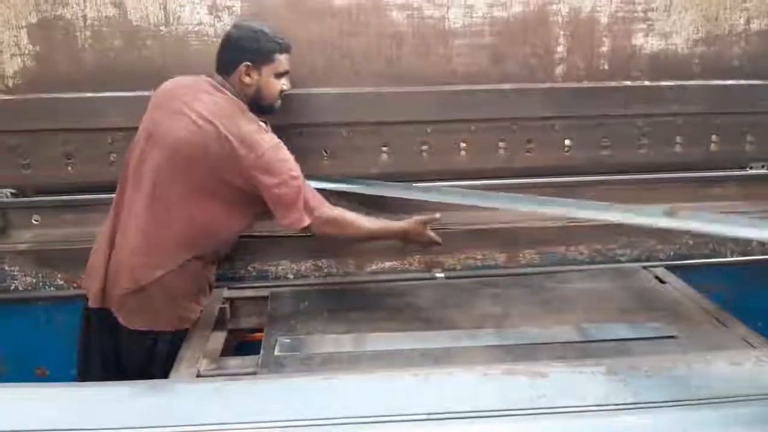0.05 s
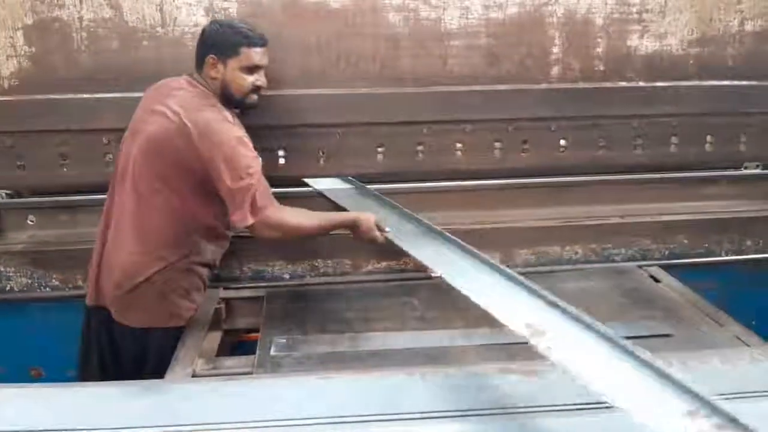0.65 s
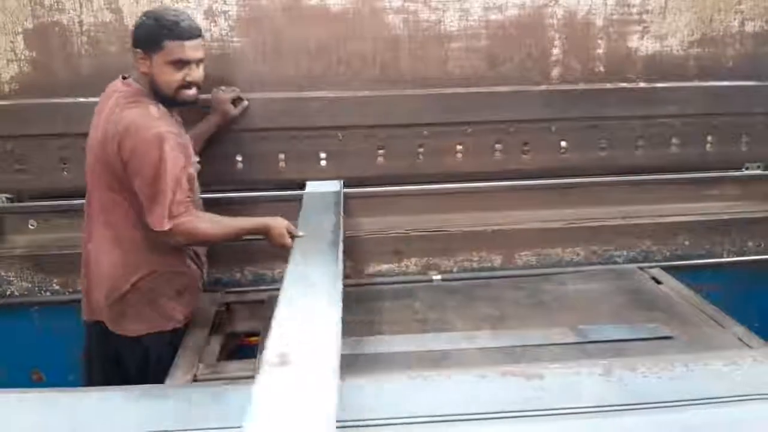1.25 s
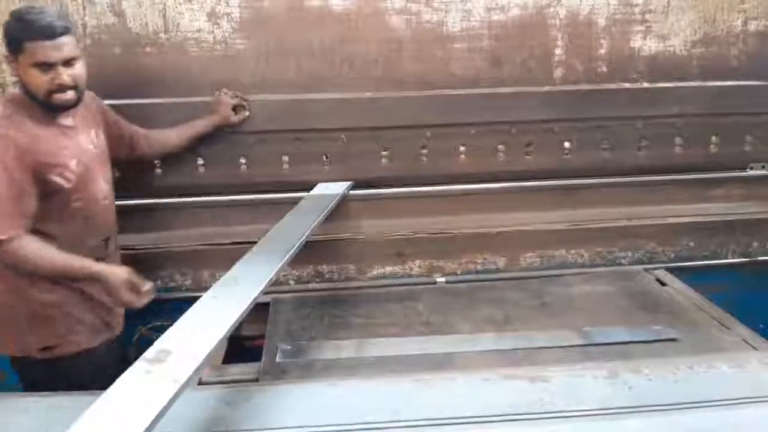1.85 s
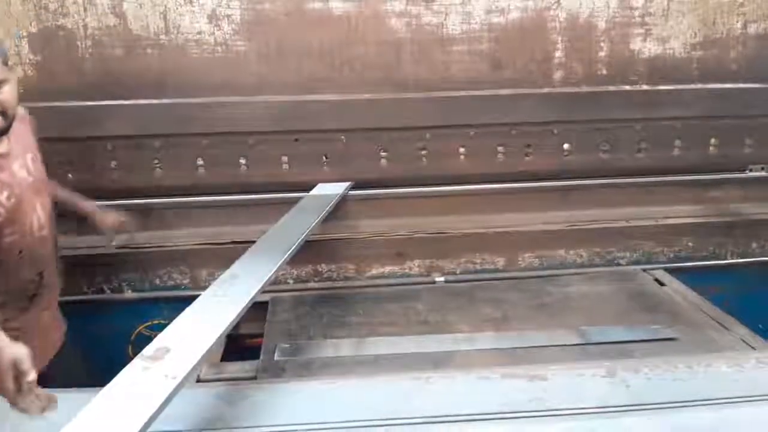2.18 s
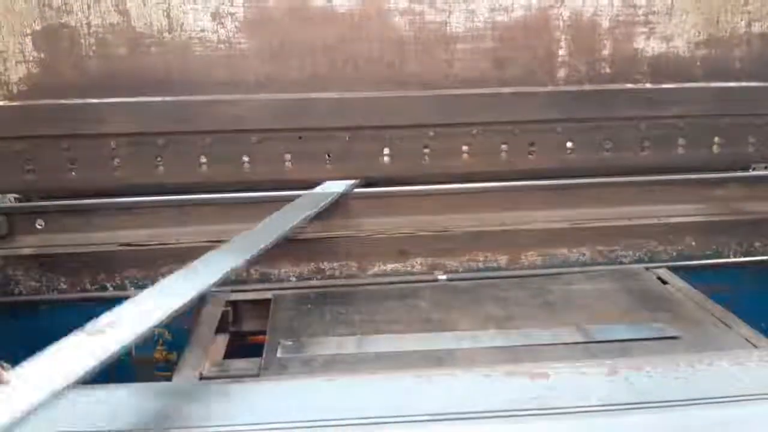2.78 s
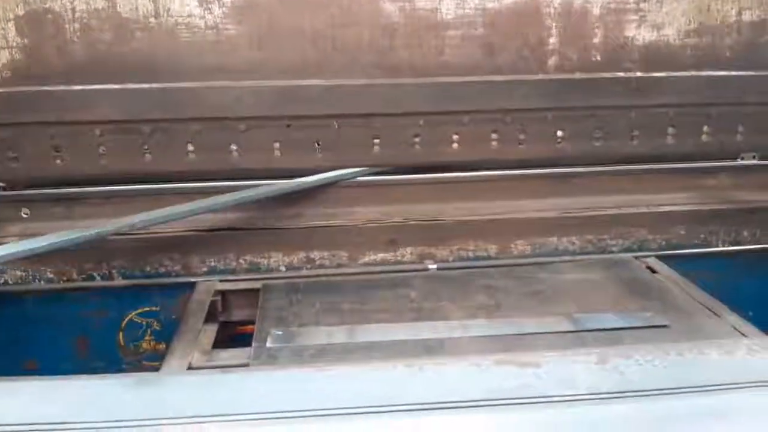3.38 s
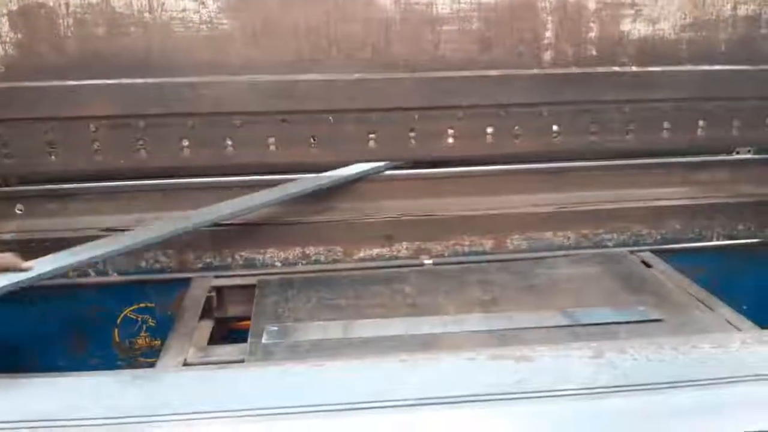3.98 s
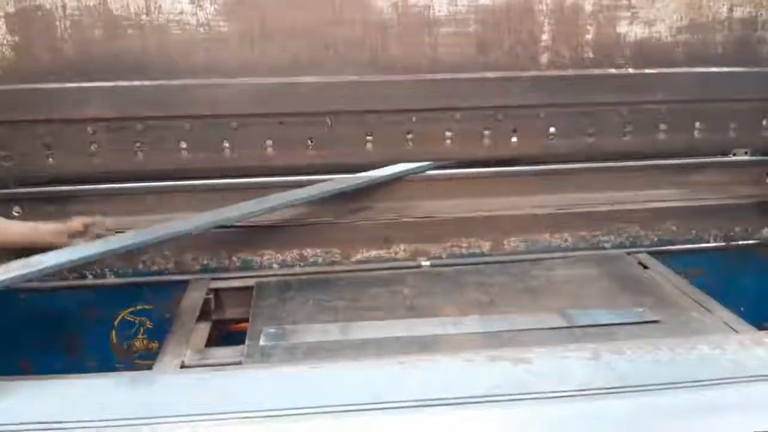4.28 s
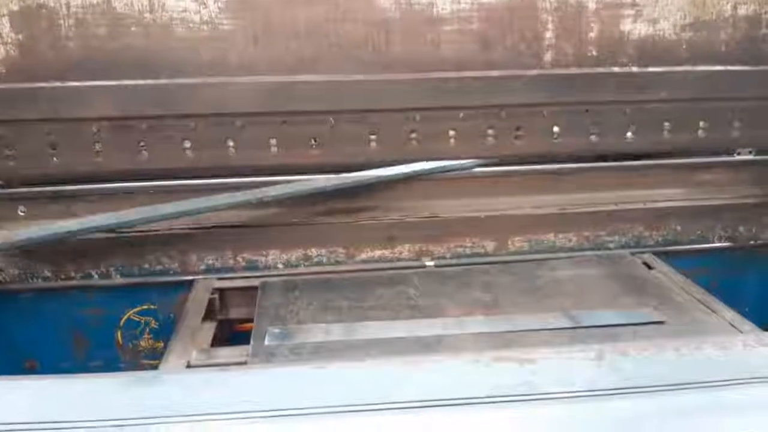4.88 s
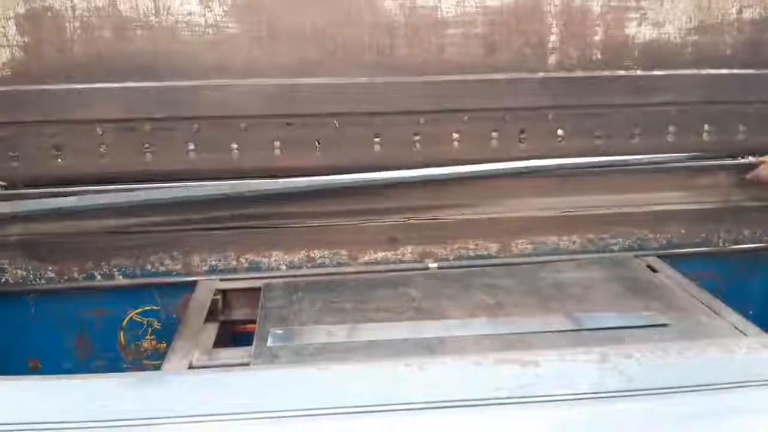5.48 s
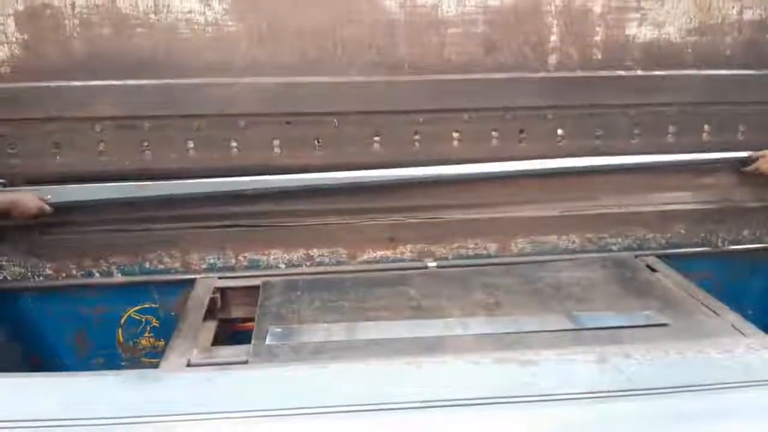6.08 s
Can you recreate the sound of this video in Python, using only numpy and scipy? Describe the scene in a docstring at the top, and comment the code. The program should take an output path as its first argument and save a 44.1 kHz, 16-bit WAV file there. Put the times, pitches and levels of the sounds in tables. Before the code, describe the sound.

A steel strip scrapes and rings across a rumbling shear's bed, slides softly, then is shoved home with three rattling clanks.

```python
"""Steel strip on an idling shear

A long strip is swung round on the bed of a sheet-metal shear: its edge chatters and the steel rings.
It then slides and flexes softly, and is shoved against the stops three times with a rattling clank
and a short squeal. The drive rumbles in a hard workshop; a draught buffets the two microphone ports."""
import sys
import numpy as np
from scipy import signal
from scipy.fft import rfft, irfft, next_fast_len
from scipy.io import wavfile
from scipy.ndimage import uniform_filter1d

SR = 44100
rng = np.random.default_rng(int(sys.argv[2]) if len(sys.argv) > 2 else 0)


def wav_out(sig):
    """Save sig, one row per channel (or a flat mono array), as 16-bit PCM at SR to the path in sys.argv[1]."""
    wavfile.write(sys.argv[1], SR, np.round(np.clip(np.atleast_2d(sig).T, -1, 1) * 32767).astype(np.int16))


N = 271126
TIME = np.arange(N) / SR
# The strip's bending modes. Each row: frequency in Hz, level in dB.
STRIP_MODES = [(647, 6.5), (748, 4.5), (818, 0), (909, 4.5), (1012, 1.5), (1072, 2), (1174, 0), (1264, 8),
               (1368, 8.5), (1464, 5.5), (1530, 2), (1868, 2.5), (2077, 0.5), (2190, 0.5), (2612, -1.5),
               (2975, -10), (3120, 4), (4183, -8)]


def drag():
    """With each pull the edge chatters over the bed; the strip's ring shifts with the overhang."""
    # Pulls that swing the strip round. Each row: start, rise, hold and fade in seconds, edge level
    # in dB, body and grit offsets from it in dB, upper minus lower body in dB.
    pulls = [(-.08, 0.13, 0.091, 0.3, -19, 0.5, -2, 10), (0.256, 0.067, 0.1, 0.092, -17, -1, -8, 2.5),
             (0.38, 0.073, 0.18, 0.071, -16, -3.5, -3.5, 13.5),
             (0.633, 0.036, 0.052, 0.033, -16, -3, 1.5, 22), (0.704, 0.034, 0.079, .22, -17, -2, -6.5, 1.5),
             (1.006, 0.016, 0.095, 0.03, -14.5, -4.5, -0.5, -1),
             (1.136, 0.015, 0.027, 0.087, -17.5, -4, -5, -1), (1.198, 0.055, 0.032, 0.12, -23.5, 0, -15, 2),
             (1.37, 0.067, 0.17, 0.11, -40.5, 1, 0, 4)]
    # Tone of the dragged edge. Each row: frequency in Hz, gain in dB.
    edge_eq = [(250, -22), (360, -6.5), (480, -9.5), (560, -4), (750, 1), (920, 2), (1100, -1.5),
               (1350, -6.5), (1700, -6), (2400, -4), (3500, -9), (6200, -12), (9400, -24.5), (12800, -24),
               (14500, -48)]
    # The drag is brighter on the right. Each row: frequency in Hz, left minus right in dB.
    shadow = [(1300, 0.5), (2400, -1.5), (4400, -2.5), (7000, -4.5), (9500, -18), (14000, -26)]
    forces = []
    for start, rise, hold, fade, edge_db, body_db, grit_db, upper_db in pulls:
        shares = np.vstack([panned(edge_db + body_db, upper_db), undb(edge_db), undb(edge_db + grit_db)])
        forces.append(shares * stroke(start, rise, hold, fade))
    upper_force, lower_force, bite_force, grit_force = together(forces)
    ticks = slips(rate=2500, spread_db=2.5) * undb(3.5 * walk(110))
    ring = steel(ticks, STRIP_MODES, modes_db=-10.5, mode_t60=0.38, wander_db=2.5, thicket_db=-5)
    ring = colour(ports(scatter(ring, longest_s=0.035, t60=0.37)), edge_eq)
    ring = np.roll(ring, -SR, axis=-1)  # the strip is already ringing
    ring = ring * undb(0.57 * walk(130) + 1.6 * walk(30.04))  # the edge catches and surges
    upper = even(band(ring, 700, 2170), span_s=0.059) * upper_force
    lower = even(band(ring, 140, 723), span_s=0.11) * lower_force
    bite = even(band(ring, 1630, 5140), span_s=0.033) * bite_force * undb(-2.5)
    grit = unit(band(ring, 5520, 14300)) * grit_force * undb(-2 + 0.83 * walk(61.4))
    scrape = (upper + lower) / np.sqrt(2) + bite + grit
    hz, shadow_db = np.transpose(shadow)
    sides_db = 20 * np.log10(panned(0, shadow_db))
    return np.array([colour(side, np.c_[hz, db]) for side, db in zip(scrape, sides_db)])


def rasps():
    """The edge digs in: coarse stick-slip chatter rings a resonance that glides as it travels."""
    # Each row: start and length in seconds, first pitch, last pitch and bandwidth in Hz, level in dB.
    glides = [(-.02, 0.23, 825, 935, 151, -19.5), (-.02, 0.23, 1990, 2140, 350, -26),
              (.43, 0.32, 950, 1120, 160, -25), (.4, 0.35, 1200, 1380, 237, -19.5),
              (.36, 0.17, 2650, 2400, 400, -23), (0.582, 0.16, 2400, 3160, 350, -19),
              (0.71, 0.22, 1540, 1400, 120, -24.5), (0.85, 0.12, 2830, 2550, 300, -27),
              (1.02, 0.053, 696, 580, 200, -24), (4.943, 0.46, 815, 730, 350, -38.5),
              (5.01, .38, 2170, 2390, 700, -44), (5.178, 0.087, 2330, 2330, 111, -35)]
    chatter_db, chatter_hz = 1, 191
    ticks = ports(slips(rate=1800, spread_db=4)) * undb(chatter_db * walk(chatter_hz))
    out = np.zeros((2, N))
    for start, length, first_hz, last_hz, width_hz, db in glides:
        now = (TIME >= start) & (TIME < start + length)
        along = (TIME[now] - start) / length
        carrier = np.exp(2j * np.pi * np.cumsum(first_hz + (last_hz - first_hz) * along) / SR)
        # shift down, low-pass, shift back: a moving band-pass
        narrow = signal.lfilter(*signal.butter(2, width_hz / 2, fs=SR), ticks[:, now] / carrier)
        out[:, now] += undb(db) * unit((narrow * carrier).real) * np.sin(np.pi * along)
    return out


def cracks():
    """The edge snags with short bright cracks, close to the right port."""
    # Each row: start in seconds, level in dB, decay in seconds.
    snags = [(0.26, -15.5, 0.1), (.893, -15.5, 0.026), (0.996, -20, .015), (1.016, -30.5, .045),
             (1.144, -15, 0.0082), (1.219, -21, 0.043)]
    strikes = together(undb(db) * stroke(start, 0.0005, 0, decay) for start, db, decay in snags)
    bright = colour(rng.standard_normal((2, N)), [(13000, -3.5), (15000, -26)])
    return bright * strikes * panned(0, -8)


def shoves():
    """Each shove bites harshly, then steel rattles on steel and dies away into the room."""
    # A faint nudge and three hard shoves. Each row: start in seconds, level in dB, rattle hold and
    # fade in seconds, bite centre in Hz, bite offset in dB, bite hold in seconds.
    hits = [(5.188, -36.5, 0.0073, 0.054, 2300, -1.5, 0.018), (5.485, -17, 0.038, 0.088, 4200, -4.5, 0.043),
            (5.813, -17.5, 0.06, 0.12, 3640, 2.5, 0.047), (6.119, -14.5, 0.063, .07, 4200, 1, 0.066)]
    # Tone of the rattle. Each row: frequency in Hz, gain in dB.
    rattle_eq = [(300, -12), (800, 5), (1200, 1), (2100, 7.5), (3000, 3), (4300, -6), (6500, -2.5),
                 (7800, -10), (9000, -18.5), (12000, -16.5), (15000, -32)]
    # Modes of the steel stops. Each row: frequency in Hz, level in dB.
    stop_modes = [(813, -1), (931, 2), (1395, 8.5), (2110, 1), (2205, -4), (2460, 1), (2681, 4),
                  (2985, -3.5), (3160, 2), (3284, -3), (3673, 2), (3945, 8), (4370, 13), (6780, 4)]
    bite_spread = 1.46  # band edges lie this factor either side of the centre
    rattle = unit(colour(slips(rate=3000, spread_db=1.5), rattle_eq))
    grind = ports(slips(rate=2900, spread_db=0))
    force, bite = 0, 0
    for start, db, hold, fade, bite_hz, bite_db, bite_hold in hits:
        force += undb(db) * rattle * stroke(start, rise=0.0023, hold=hold, fade=fade)
        harsh = unit(band(grind, bite_hz / bite_spread, bite_hz * bite_spread))
        bite += undb(db + bite_db) * harsh * stroke(start, rise=0.014, hold=bite_hold, fade=0.036)
    ring = steel(force, stop_modes, modes_db=-6.5, mode_t60=0.28, wander_db=1, thicket_db=-0.5)
    clank = ports(unit(ring) * np.std(force))
    return workshop(clank + bite, wet_db=-9, t60=0.75)


def squeals():
    """The edge locks on to one high mode and sings unsteadily."""
    # Each row: start and length in seconds, pitch in Hz, level in dB.
    notes = [(.41, 0.22, 3690, -29), (0.31, 0.15, 2185, -26.5), (1.252, 0.24, 3070, -52),
             (1.325, 0.35, 2217, -38.5), (2.582, 0.085, 3080, -50), (2.77, .09, 3110, -56),
             (3.603, 0.08, 3090, -45.5), (4.608, 0.052, 3070, -44), (6.048, 0.14, 3096, -28.5),
             (6.12, 0.057, 3120, -17)]
    waver = 1 + 0.006 * walk(400)
    out = np.zeros(N)
    for start, length, hz, db in notes:
        tone = unit(np.sin(2 * np.pi * np.cumsum(hz * waver) / SR))
        out += undb(db) * swell(start, length) * tone
    return workshop(out, wet_db=-10, t60=0.69)


def slide():
    """Lying flat, the strip only hisses with each push: many tiny slips."""
    # Each row: start, rise, hold and fade in seconds, level in dB.
    pushes = [(2.1, 0.037, .02, 0.04, -50), (2.55, 0.73, 0.27, 0.11, -45.5),
              (3.657, 0.11, 0.091, .05, -36.5), (3.829, 0.061, 0.12, 0.052, -28.5),
              (4.037, 0.042, 0.13, 0.07, -33.5), (4.537, 0.14, 0.055, 0.096, -46.5),
              (5.049, 0.32, .08, 0.12, -43.5)]
    # Tone of the sliding hiss. Each row: frequency in Hz, gain in dB.
    slide_eq = [(1200, -5), (2300, -6), (3600, -3), (5500, -5.5), (7500, -4.5), (9500, -13.5), (12600, -5),
                (14500, -30)]
    force = together(undb(db) * stroke(start, rise, hold, fade) for start, rise, hold, fade, db in pushes)
    ticks = slips(rate=5200, spread_db=3.5)
    ring = steel(ticks, STRIP_MODES, modes_db=-32, mode_t60=0.13, wander_db=11, thicket_db=11)
    return unit(colour(ports(ring), slide_eq)) * force * panned(0, -2.2)


def flex():
    """The strip bends and slaps the bed in dull knocks and longer hollow wobbles."""
    # Each row: start, rise, hold and fade in seconds, band centre in Hz, level in dB.
    bends = [(0.255, 0.002, 0.013, 0.01, 240, -22), (1.1, .0015, 0.0037, 0.004, 380, -30),
             (2.552, .004, 0.0071, 0.011, 380, -29), (3.631, .004, .008, 0.01, 400, -26),
             (3.814, .01, 0.1, 0.074, 233, -25), (4.076, 0.0057, .008, 0.0059, 333, -25),
             (4.547, 0.57, 1.1, .2, 394, -40.5), (4.956, .002, 0.0069, .02, 670, -27),
             (4.995, .0027, 0.0075, 0.011, 378, -23), (5.366, .0015, 0.0041, 0.0066, 714, -24.5),
             (5.464, 0.0014, .009, 0.0042, 400, -18), (5.623, 0.0029, 0.0067, .008, 390, -18.5),
             (5.68, .002, .015, 0.027, 400, -29)]
    spread = 1.4  # band edges lie this factor either side of the centre
    noise = ports(rng.standard_normal((2, N)))
    out = 0
    for start, rise, hold, fade, hz, db in bends:
        boom = even(band(noise, hz / spread, hz * spread), span_s=0.037)
        out += undb(db) * boom * stroke(start, rise, hold, fade)
    return out * unit(undb(1.16 * walk(30)))


def drive():
    """Gears and flywheel rumble unevenly in the frame, with wavering tones and a faint hiss."""
    # The drive's level ride. Each row: time in seconds, level in dB.
    ride = [(0, -35), (.8, -42), (1.5, -40), (1.9, -41.5), (2.4, -41.5), (2.75, -37), (3.2, -34),
            (4.3, -34), (4.6, -38), (5.0, -34), (6.1, -36)]
    # Tone of the rumble. Each row: frequency in Hz, gain in dB.
    rumble_eq = [(40, -13.5), (80, 4), (130, 5.5), (200, 4), (270, 11), (400, 0), (680, -2), (830, 4),
                 (960, -4), (1120, -9), (1750, -8.5), (1985, -8.5), (2500, -13), (4000, -17.5), (7000, -21),
                 (14000, -67)]
    # The drive's hum. Each row: pitch in Hz, level at full strength in dB.
    tones = [(88, -45.5), (108, -44), (248, -39), (274, -44), (322, -41.5), (840, -45.5)]
    churn_from_db, churn_full_db, hum_full_db = -40, -32, -37.5  # points on the level ride
    direct_db, hum_wander_db = -7, 2
    level_db = curve(ride)
    from_walls = ports(rng.standard_normal((2, N)))
    from_gears = undb(direct_db) * later_on_right(rng.standard_normal(N))
    rumble = colour(from_walls + from_gears, rumble_eq)
    rumble /= np.std(band(rumble, 450, 1100))  # the mids set the level
    effort = np.clip((level_db - churn_from_db) / (churn_full_db - churn_from_db), 0, 1)
    churn_db = 2 + effort * (walk(15) + 4.4 * walk(60))  # the lifted bass churns as the drive swells
    rumble = (rumble + band(rumble, 30, 370) * (undb(churn_db) - 1)) * undb(level_db - 0.32)
    hum = 0
    for hz, db in tones:
        wavering_hz = hz * (1 + 0.002 * walk(120)) + 1.51 * walk(22.05)
        tone = np.sin(2 * np.pi * np.cumsum(wavering_hz) / SR)
        hum += unit(tone * undb(hum_wander_db * walk(15))) * undb(db)
    swell_db = level_db - hum_full_db
    hum *= undb(np.minimum(swell_db, 0))  # the tones sink with the rumble
    hiss = unit(band(rng.standard_normal((2, N)), 5800, 12800))
    hiss *= panned(db=-56, pan_db=-37) * undb(0.63 * swell_db)
    return rumble + hiss + later_on_right(hum)


def whine():
    """The gear mesh sings one steady high tone inside a narrow rough band."""
    # The whine's level ride. Each row: time in seconds, level in dB.
    ride = [(0, -51), (1.9, -55.5), (2.45, -55.5), (2.72, -46.5), (3.35, -47.5), (3.9, -52), (6.1, -58)]
    mesh_hz, rough_db, right_lag_s = 1954, -2, 0.00017
    cycles = np.cumsum(mesh_hz * (1 + 0.000985 * walk(8))) / SR
    tone = np.sqrt(2) * np.sin(2 * np.pi * np.array([cycles, cycles - mesh_hz * right_lag_s]))
    rough = unit(band(rng.standard_normal((2, N)), mesh_hz - 45, mesh_hz + 90))
    return (tone + undb(rough_db) * rough) * undb(curve(ride) + 0.8 * walk(11))


def draught():
    """Eddies hit each port separately: a light restless rumble that swells and thumps in gusts."""
    # Each row: start in seconds, level in dB, left minus right in dB, length in seconds.
    gusts = [(-.1, -31, 2, 0.39), (0.249, -17.5, -16, 0.034), (0.484, -25.5, 18, .05),
             (0.72, -30, 2, 0.075), (1.094, -17, -30, 0.029), (1.647, -21, 15, 0.019), (2.442, -24, 0, 0.4),
             (2.85, -26.5, 0.5, 1.32), (2.882, -15, 19, 0.075), (2.993, -16.5, 3, 0.071),
             (3.063, -15, 1, 0.079), (3.145, -19.5, 0, 0.048), (3.268, -13.5, 20, 0.034),
             (3.327, -9.5, 14, 0.015), (3.354, -13.5, 7, 0.049), (3.517, -17.5, 10, 0.033),
             (3.565, -10, 20, 0.029), (3.748, -20, 6, .03), (3.814, -10.5, 24, 0.038),
             (3.834, -17, -4.5, 0.2), (4.097, -31.5, -17, 3.1), (4.567, -18.5, -1, 0.027),
             (5.008, -20.5, -0.5, 0.057), (5.133, -25, 9, 0.021), (5.263, -26, 13, 0.037),
             (5.386, -13.5, 1, 0.019), (5.502, -10.5, 2, 0.018), (5.612, -19, -5, 0.025),
             (5.678, -22, -2, 0.045)]
    # Tone of the eddies. Each row: frequency in Hz, gain in dB.
    eddy_eq = [(20, -30), (40, -18), (65, -2), (110, 4.5), (180, -0.5), (280, -3.5), (420, -13.5),
               (800, -26.5), (2000, -60), (8000, -95)]
    lull_db, flutter_db, flutter_hz = -41, 0.5, 25.2  # the light air between gusts
    buffets = together(panned(db, pan_db) * swell(start, length) for start, db, pan_db, length in gusts)
    flutter = np.array([unit(undb(flutter_db * walk(flutter_hz))) for _ in range(2)])
    eddies = even(colour(rng.standard_normal((2, N)), eddy_eq), span_s=0.025)
    return eddies * together([buffets, undb(lull_db) * flutter])


def slips(rate, spread_db):
    """Two trains of random stick-slip ticks, about rate a second; spread_db makes a few stand out."""
    ticks = (rng.random((2, N)) < rate / SR) * rng.choice([-1, 1], (2, N))
    return unit(ticks * undb(spread_db * np.minimum(rng.exponential(size=(2, N)), 4)))


def steel(ticks, modes, modes_db, mode_t60, wander_db, thicket_db):
    """Ticks scatter through the steel and ring its modes, whose shares wander as the contact moves."""
    radius = np.exp(-np.log(1000) / (mode_t60 * SR))
    clear = 0
    for hz, db in modes:
        poles = [1, -2 * radius * np.cos(2 * np.pi * hz / SR), radius ** 2]
        clear += undb(db + wander_db * walk(8.96)) * signal.lfilter([1, 0, -1], poles, ticks)
    # higher up the modes crowd into a thicket
    thicket = colour(unit(crowded_modes(ticks, t60=0.07)), [(1200, -14), (3500, 7)])
    direct = colour(unit(scatter(ticks, longest_s=0.006, t60=0.053)), [(1500, 2), (4000, -11.5)])
    return direct + undb(thicket_db) * thicket + undb(modes_db) * unit(clear)


def crowded_modes(ticks, t60):
    """Dense rings that never repeat: each new contact point has its own and takes over from the last."""
    hop = SR // 12
    padded = np.pad(ticks, [(0, 0), (hop, 3 * hop)])
    fade = np.exp(-np.log(1000) * TIME[:hop + 1] / t60)
    out = np.zeros_like(padded)
    for i in range(0, N + hop, hop):
        touch = padded[:, i:i + 2 * hop] * signal.windows.cosine(2 * hop)
        ring = signal.fftconvolve(touch, rng.standard_normal((2, hop + 1)) * fade, axes=-1)
        out[:, i:i + ring.shape[1]] += ring
    return out[:, hop:hop + N]


def scatter(x, longest_s, t60, count=4):
    """Echoes of echoes: a chain of all-pass loops smears each channel without colouring it."""
    size = next_fast_len(N + SR)
    turn = -2j * np.pi * np.fft.rfftfreq(size, 1 / SR)
    spectrum = rfft(x, size)
    for channel in spectrum:
        for lag in longest_s * (np.arange(count) + 1 + rng.random(count)) / (count + 1):
            echo, feedback = np.exp(turn * lag), np.exp(-np.log(1000) * lag / t60)
            channel *= (echo - feedback) / (1 - feedback * echo)
    return irfft(spectrum, size)[:, :N]


def workshop(x, wet_db, t60):
    """Add the hard room's tail, which builds up over the first reflections."""
    t = TIME[:SR]
    tail = colour(rng.standard_normal((2, SR)), [(3500, 12), (12000, -13)])
    tail = unit(tail * np.exp(-np.log(1000) * t / t60) * np.minimum(t / 0.033, 1)) / np.sqrt(SR)
    wet = signal.fftconvolve(np.atleast_2d(x), tail, axes=-1)[:, :N]
    return (x + undb(wet_db) * wet) / np.sqrt(1 + undb(2 * wet_db))


def ports(x):
    """Mid and side to the left and right ports: alike in the bass, unrelated in the treble."""
    # Stereo width of the workshop. Each row: frequency in Hz, side minus mid in dB.
    width = [(100, -31), (350, -5), (700, -8.5), (1100, -3.5), (1600, 1.5), (2400, -2.5), (6000, 0)]
    mid, side = x[0], colour(x[1], width)
    constant_power = [(hz, -10 * np.log10(1 + undb(2 * db))) for hz, db in width]
    return colour(np.array([mid + side, mid - side]), constant_power)


def later_on_right(x, lag_s=0.00031):
    """One sound reaches the left port first, then the right."""
    return np.array([x, np.roll(x, int(lag_s * SR))])


def dip_level(x):
    """The level dips briefly."""
    # Each row: centre and half length in seconds, depth in dB.
    dips = [(0.257, 0.0021, -19), (1.113, 0.014, -10)]
    return x * undb(sum(db * bell(centre, half) for centre, half, db in dips))


def thin_bass(x):
    """The bass drops out for moments and leaves the scrape thin."""
    # Each row: centre and half length in seconds, corner in Hz, depth in dB.
    dropouts = [(0.332, 0.037, 232, -18), (0.55, 0.038, 327, -9), (0.624, 0.018, 230, -12),
                (0.69, 0.017, 560, -28), (0.777, 0.045, 200, -6)]
    for centre, half, hz, db in dropouts:
        bass = signal.sosfiltfilt(signal.butter(6, hz, fs=SR, output="sos"), x)
        x = x + bass * (undb(db * bell(centre, half)) - 1)
    return x


def duck_bass(x):
    """A suppressor turns each port's bass down while its upper mids stay loud."""
    corner_hz, threshold_db, db_per_db, average_s = 298, -18, 2.4, 0.077
    power = uniform_filter1d(band(x, 1280, 4400) ** 2, int(average_s * SR))
    over_db = np.maximum(10 * np.log10(np.abs(power) + 1e-12) - threshold_db, 0)
    bass = signal.sosfiltfilt(signal.butter(3, corner_hz, fs=SR, output="sos"), x)
    return x + bass * (undb(-db_per_db * over_db) - 1)


def stroke(start, rise, hold, fade):
    """One movement: the force builds, holds and dies away."""
    attack = np.clip((TIME - start) / rise, 0, 1)
    return attack * np.exp(-np.maximum(TIME - start - rise - hold, 0) / fade)


def swell(start, length):
    """A half-sine fade in and out."""
    return np.sin(np.pi * np.clip((TIME - start) / length, 0, 1))


def bell(centre, half):
    """A bell-shaped envelope, down to 1/e at half seconds from its centre."""
    return np.exp(-((TIME - centre) / half) ** 2)


def curve(points):
    """Join (seconds, value) points, sample by sample."""
    return np.interp(TIME, *np.transpose(points))


def walk(rate):
    """Random levels held 1 / rate s and slewed twice; spread near 1."""
    hold = max(int(SR / rate), 1)
    steps = rng.standard_normal(N)[np.arange(N) // hold]
    return unit(uniform_filter1d(uniform_filter1d(steps, hold), hold))


def together(gains):
    """Overlapping movements add in power."""
    return np.sqrt(sum(g ** 2 for g in gains) + 1e-18)


def panned(db, pan_db):
    """Two gains of constant total power, the first pan_db above the second."""
    sides = undb(np.array([pan_db, -pan_db]).reshape(2, -1) / 2)
    return undb(db) * sides / np.sqrt(np.mean(sides ** 2, axis=0))


def colour(x, points):
    """Equalise along a curve of (Hz, dB) points."""
    size = next_fast_len(x.shape[-1] + 4096)
    hz, db = np.transpose(points)
    log_hz = np.log(np.fft.rfftfreq(size, 1 / SR) + 1)
    gain = undb(np.interp(log_hz, np.log(hz), db))
    return irfft(rfft(x, size) * gain, size)[..., :x.shape[-1]]


def band(x, lo_hz, hi_hz):
    """Band-pass without delay."""
    sos = signal.butter(2, [lo_hz, min(hi_hz, SR / 2 - 1)], "band", fs=SR, output="sos")
    return signal.sosfiltfilt(sos, x)


def even(x, span_s):
    """Hold a noise at rms 1 from moment to moment."""
    return x / np.sqrt(np.abs(uniform_filter1d(x ** 2, int(span_s * SR))) + 1e-18)


def unit(x):
    """Scale to rms 1."""
    return x / np.sqrt(np.mean(x ** 2))


def undb(db):
    """Decibels to gain."""
    return 10 ** (np.asarray(db) / 20)


def scene():
    """Strip, machine and moving air together."""
    strip_and_shear = drag() + rasps() + slide() + shoves() + squeals() + drive() + whine()
    return thin_bass(dip_level(strip_and_shear) + cracks() + flex() + draught())


def record(dry):
    """The bass is ducked, peaks clip at full scale and the top is cut."""
    # The left channel sounds slightly duller above 10 kHz. Each row: frequency in Hz, gain in dB.
    left_channel_eq = [(10000, -0.5), (12000, -3.5)]
    top_hz = 15500
    left, right = duck_bass(dry)
    clipped = np.clip([colour(left, left_channel_eq), right], -1, 1)
    return signal.sosfilt(signal.ellip(8, 0.2, 80, top_hz, fs=SR, output="sos"), clipped)


dry = scene()
out = record(dry)
wav_out(out)
```